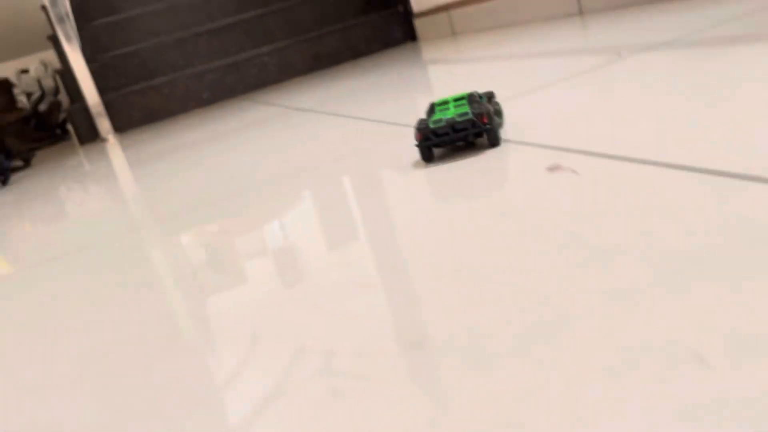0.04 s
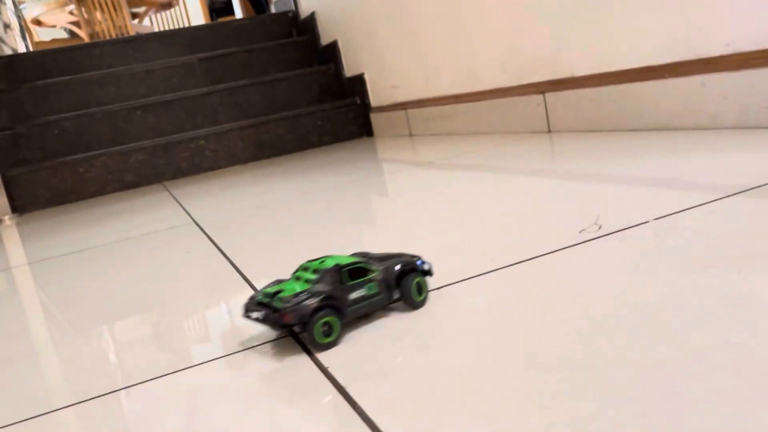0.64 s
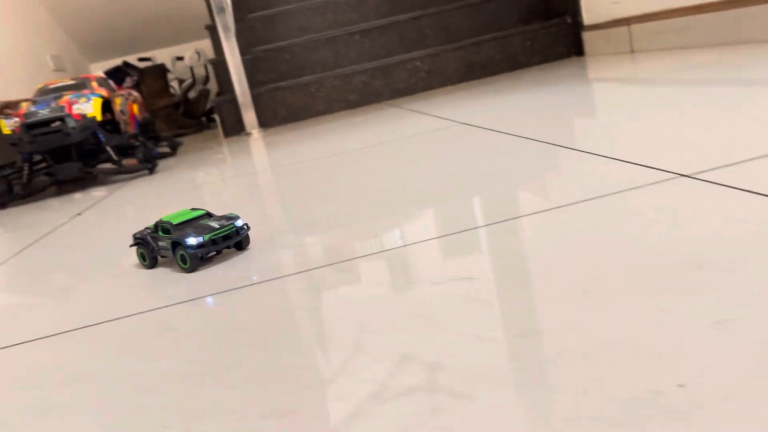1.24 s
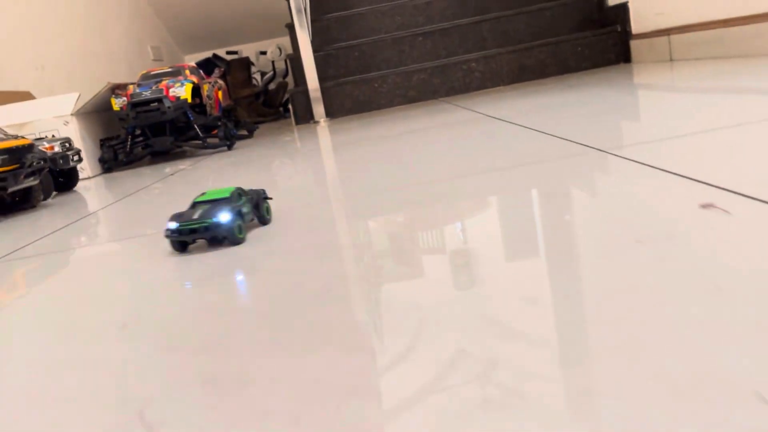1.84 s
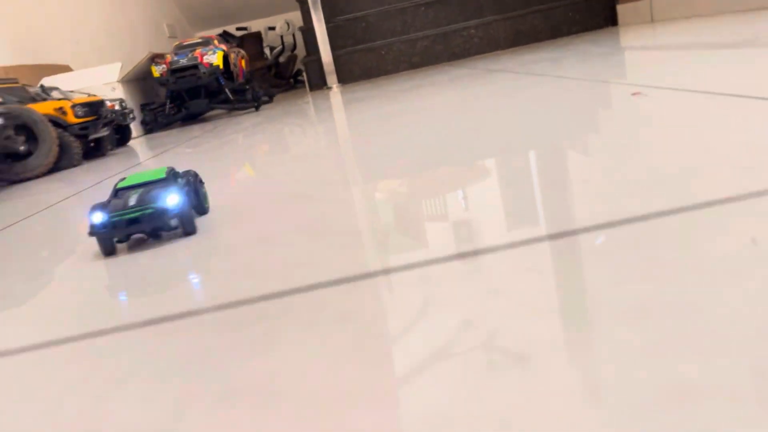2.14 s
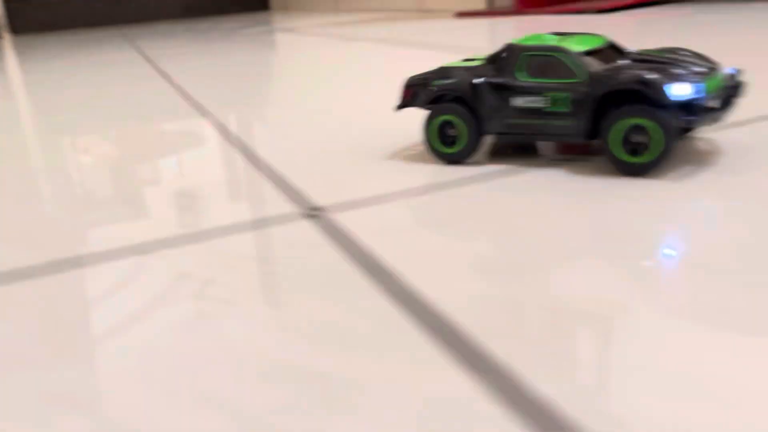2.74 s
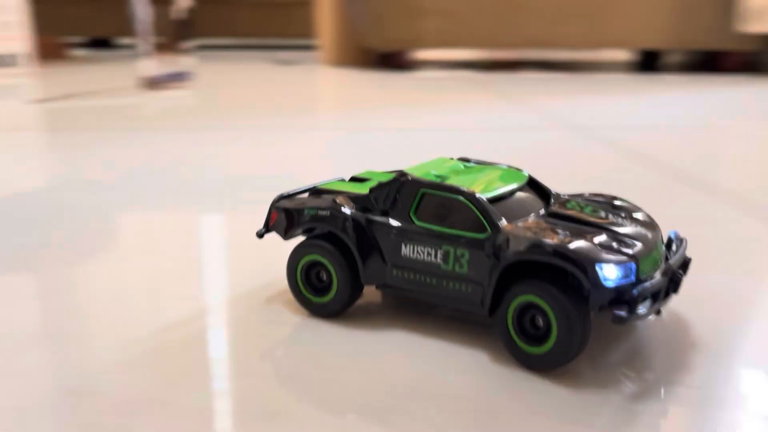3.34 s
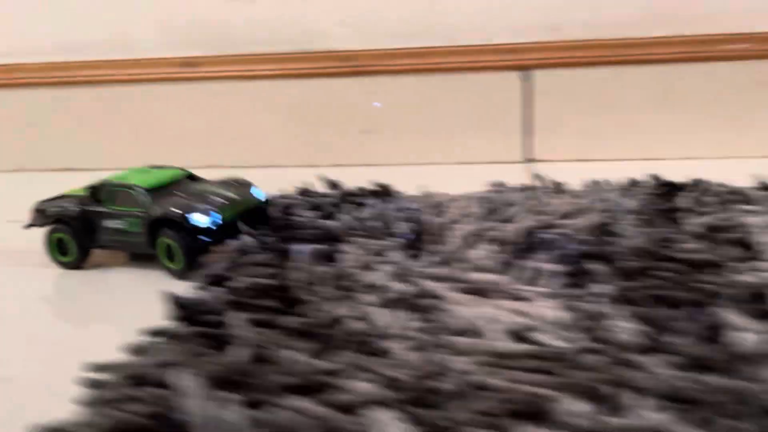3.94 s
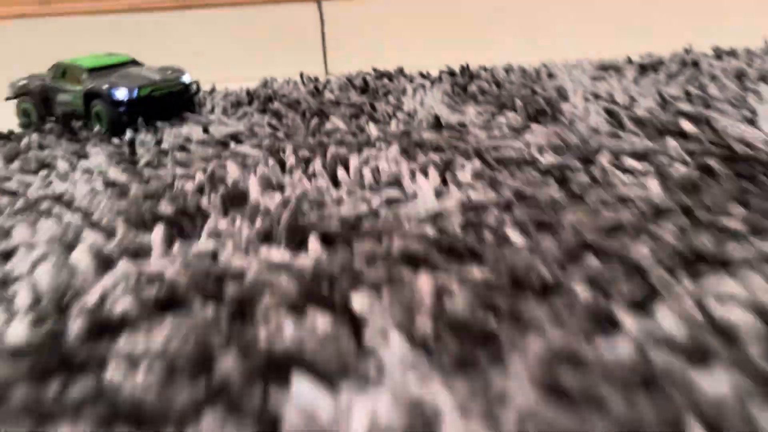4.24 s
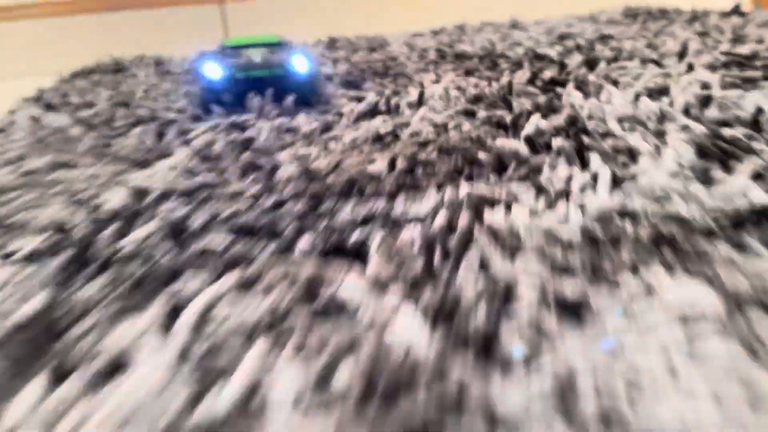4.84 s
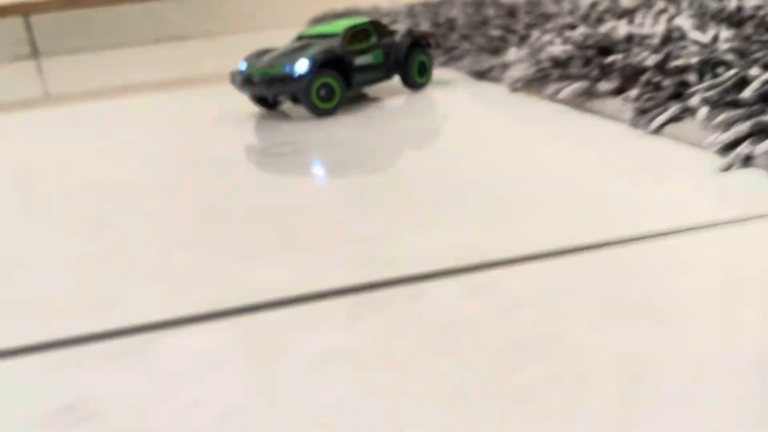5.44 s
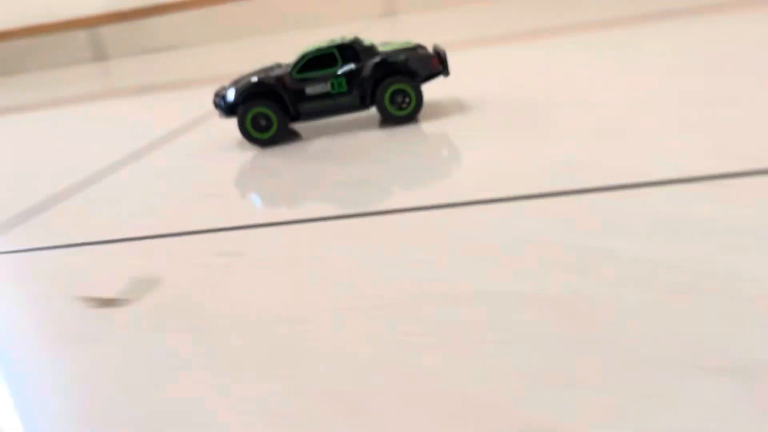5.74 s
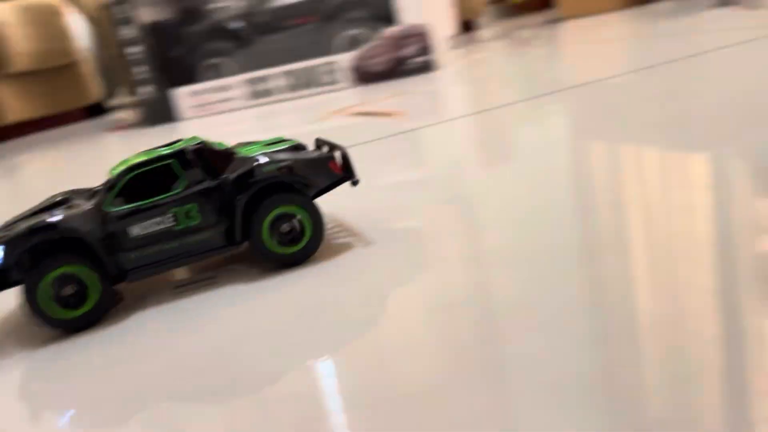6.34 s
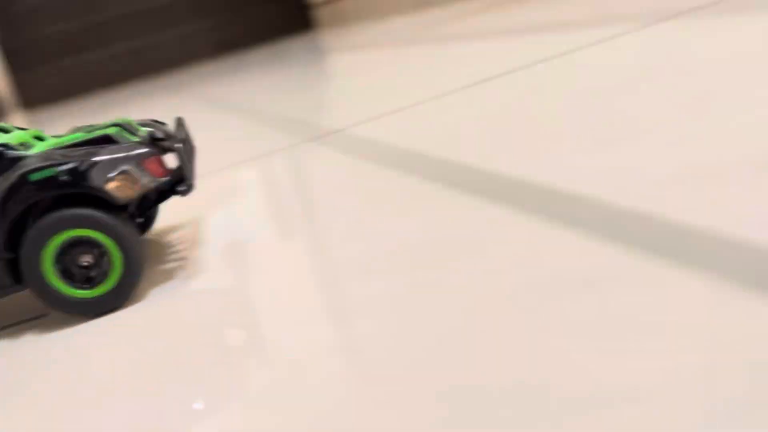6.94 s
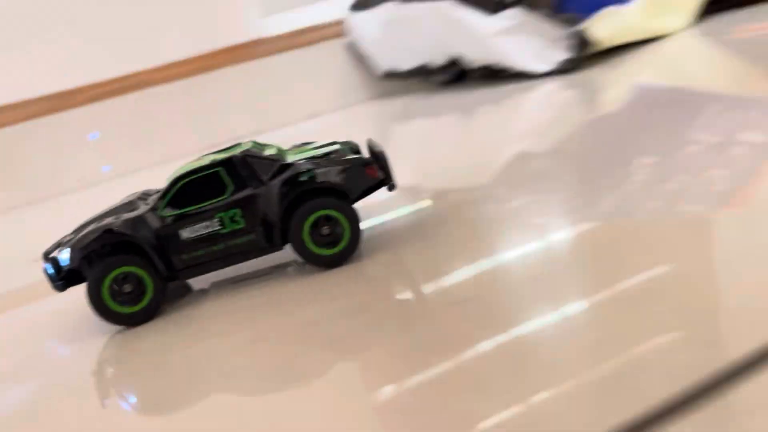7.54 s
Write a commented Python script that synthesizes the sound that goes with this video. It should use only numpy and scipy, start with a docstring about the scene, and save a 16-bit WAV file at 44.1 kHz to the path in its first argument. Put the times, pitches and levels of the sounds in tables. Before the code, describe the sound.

Plastic gears whine and a loose shell rattles and clacks as a toy truck drives across tile, over a rug and back.

```python
"""A small battery toy truck on the tiled floor of a hard room, followed with a hand-held microphone.
It coasts down, makes a short run, then a longer one: plastic gears whirr, the wheels shake the loose
shell into a rattle and clack over the joints. At 4 s it enters a shaggy rug, where little but the
labouring gears is left. From 5.4 s it is back on tile and rattles past close to the microphone.
Soft handling thumps, the low rush of the room and a faint hum lie underneath."""
import sys
import numpy as np
from scipy import signal
from scipy.fft import rfft, irfft
from scipy.io import wavfile
from scipy.ndimage import uniform_filter1d

SR = 44100
rng = np.random.default_rng(int(sys.argv[2]) if len(sys.argv) > 2 else 0)


def persist_wave(psi):
    """Save psi, clipped to +-1, as 16-bit WAV."""
    counts = np.round(np.clip(psi, -1, 1) * 32767).astype(np.int16)
    wavfile.write(sys.argv[1], SR, np.atleast_2d(counts).T)


N = 339129

# the legs of the drive: t/s, gear level at the microphone/dB, tooth rate/Hz
COAST = [(0, -47, 2150), (.15, -49.5, 2080), (.23, -52.5, 1900), (.33, -61.5, 1650), (.46, -63.5, 1400)]
SHORT_RUN = [(0.551, -59.5, 1400), (.66, -53, 1600), (0.799, -50.5, 1654), (1.03, -47.5, 2296),
             (1.15, -51, 1961), (1.281, -51.5, 1546), (1.42, -63.5, 1384)]
LONG_RUN = [(1.531, -61.5, 1493), (1.65, -52, 1710), (1.76, -49.5, 2020), (2.12, -46.5, 2097),
            (2.23, -45, 1780), (2.45, -44.5, 2019), (2.65, -44.5, 2119), (2.85, -43, 2389),
            (3.45, -41.5, 2330), (3.8, -47.5, 2280)]
RUG_CROSSING = [(4.05, -55, 1696), (4.11, -52, 1654), (4.2, -57, 1575), (4.34, -55.5, 1543),
                (4.5, -52.5, 1551), (4.85, -50.5, 1581), (5.05, -48, 1899), (5.37, -47.5, 2053)]
CLOSE_PASS = [(5.6, -45, 1661), (5.85, -44.5, 1682), (6.3, -42.5, 1989), (6.55, -40.5, 2545),
              (7.03, -39, 2550), (7.23, -42, 2388), (7.69, -48.5, 2443)]
# how far the wheels are in the pile of the rug: t/s, share (0-1)
ON_RUG = [(3.95, 0), (4.1, 0.98), (5.3, 1), (5.42, 0.05)]
# bursts of throttle load the gears: crest t/s, half length/s, whine lift/dB, lift of its octave/dB
THROTTLE = [(0.756, 0.04, 11, 8), (.87, 0.038, -2, 7), (.96, .05, 13, 1), (1.77, 0.094, 13.5, -7),
            (2.299, 0.08, 2, 5), (2.52, 0.16, 13, 4.5), (3.482, 0.11, -5, 7), (6.15, .15, -8, 9),
            (6.52, 0.077, 5, 4.5)]
# gears surge as the wheels slip and grip in the pile: crest t/s, f/Hz, level/dB, half length/s
SURGES = [(4.39, 1687, -48, 0.0089), (4.4, 1690, -45, 0.0078), (4.482, 1590, -49, .014),
          (4.637, 2000, -47, 0.02), (4.749, 2132, -46, 0.017), (4.899, 2088, -48, 0.02),
          (4.989, 2000, -43, 0.0047), (5.022, 2168, -39.5, 0.0062), (5.119, 2293, -43.5, 0.016),
          (5.23, 2344, -44, 0.014), (5.329, 2154, -44, 0.0087)]
# the side facing the microphone: t/s, chassis ring/dB, shell ring/dB (both re rattle), tyre lift/dB
FACING = [(0, -4.5, -4, 0.5), (.9, 1, -4.5, 0.5), (2.35, -17, -11, -6), (2.95, -13, -2.5, -0.5),
          (3.6, -2.5, 0, 4), (4.4, -9, -18, 7), (5.1, -8, -26, -11), (5.7, -4, -3, -0.5),
          (7.69, -2, -16, 4)]
# the chassis clacks at tile joints and jolts: t/s, strength/dB, offset for the low body/dB
CLACKS = [(0.097, -46, -17), (0.2185, -39, -15), (0.5863, -42, -11), (.617, -40.5, -10), (1.023, -53, 10),
          (1.3852, -40.5, -25), (1.8694, -41.5, -12), (2.261, -49, -14), (2.4298, -37, -12),
          (2.4687, -42, -6), (2.9936, -38, -5), (3.1342, -38.5, 3), (3.1831, -33.5, 0), (3.2313, -26.5, -7),
          (3.2845, -32, -7), (3.3131, -31, -3), (3.465, -32.5, -26), (3.6638, -33.5, -6),
          (3.713, -40.5, 3.5), (3.787, -40, 6.5), (3.8047, -43, -6.5), (3.8906, -38.5, -3.5),
          (3.913, -37, -5), (4.0937, -56.5, -0.5), (5.4076, -34.5, -22), (5.4153, -37, -5),
          (5.447, -37, -18), (5.4911, -32, -7.5), (5.5683, -33.5, -27), (5.6137, -39, -13),
          (5.6497, -38, -3.5), (6.2347, -34, -23), (6.2622, -32.5, -12), (6.2808, -35, -18),
          (6.3108, -35, -11), (6.3662, -32, -10), (6.6846, -33, -3), (6.82, -38.5, 5), (6.9435, -30, -11),
          (6.9823, -45.5, 11), (7.2424, -34.5, -24), (7.3432, -36.5, -14), (7.6151, -41.5, -25)]
# handling thumps at the microphone: t/s, peak level/dB, f/Hz
THUMPS = [(.1, -53, 60), (0.133, -50.5, 99.5), (0.363, -45.5, 80), (.57, -63, 109), (2.44, -50, 69.5),
          (3.621, -47.5, 74.4), (6.556, -40.5, 94), (6.662, -49, 84.3), (6.772, -50, 59.8),
          (7.315, -44, 67.9)]
# swells of the background hum: crest t/s, level/dB
HUM_SWELLS = [(1.35, -69), (2.55, -78), (3.65, -68.5), (4.8, -73)]
# colours of the truck's parts and of the room's rush: f/Hz, relative level/dB
GEARBOX_COLOUR = [(600, -22.5), (900, -8.5), (1080, -7), (1200, 1), (1370, 1), (1490, -3.5), (1640, 0),
                  (1850, -6), (2120, -1), (2400, -4.5), (2750, -8), (3100, -19), (5000, -32)]
SHELL_COLOUR = [(700, -22), (1250, 0), (1850, -9.5), (2300, 7), (2850, -4), (3400, 3.5), (3850, -2.5),
                (4250, -1.5), (5500, -2), (7000, -8), (8200, -4.5), (9500, -14.5), (12000, -14.5)]
TICK_COLOUR = [(7000, -2.5), (9000, -3.5), (10300, -6.5), (11300, -12), (13200, -7.5), (14700, 1.5),
               (16000, -12)]
TYRE_COLOUR = [(150, -12.5), (290, -13.5), (400, -8), (720, -1.5), (950, -2), (1300, 8.5), (2500, -54.5)]
CLACK_TOP_COLOUR = [(1500, -22.5), (3000, -11.5), (4000, -2.5), (5000, 7.5), (7000, 3), (11000, -1.5),
                    (14500, -2.5), (16000, 0)]
CLACK_BODY_COLOUR = [(300, -14.5), (900, -21), (1250, 1), (1800, -9), (2500, -7), (3500, -7), (6000, -10.5)]
ROOM_COLOUR = [(20, -16), (45, 3), (75, 0), (100, 2.5), (125, -5), (160, -3.5), (230, -8.5), (400, -5),
               (900, -16), (3000, -23.5), (16000, -31.5)]
# resonances of chassis, shell, hollow wheels, motor casing and brushes: f/Hz, width/Hz, gain/dB
CHASSIS_MODES = [(2554, 170, -2), (3176, 110, -3), (1277, 450, -13.5)]
SHELL_MODES = [(4310, 790, 1), (5160, 720, 4.5), (6300, 280, 0), (8050, 200, -6)]
WHEEL_MODES = [(594, 60, 10), (370, 135, -2)]
MOTOR_MODES = [(230, 44, -1.5), (358, 79, 0.5), (10550, 350, -15)]
# how parts follow the drive: base level/dB, dB per gear dB, dB per octave of speed, change on rug/dB
RATTLE_LAW = (-45.5, 1.53, 3.5, -16)
TICK_LAW = (-52.5, 2.1, 1, -19)
ROLL_LAW = (-56.5, 1.34, -2, -4.5)
MOTOR_LAW = (-74.5, 0.9, -10.5, 1)
# the mesh sings as the motor labours: level re gears/dB, dB per octave of speed, change on rug/dB
WHINE_LAW, OCTAVE_LAW = (-13, -5, 8.55), (-11, 7.5, -13)
CRUISE_DB, CRUISE_TEETH_HZ = -45, 2000   # the drive at which these laws give their base levels


def running_truck(surge_lift_db=2, surge_half_s=0.016):
    """Drive, speed and ground set the level of every part; throttle brings out the whine."""
    drive_db, teeth_hz = in_time(COAST + SHORT_RUN + LONG_RUN + RUG_CROSSING + CLOSE_PASS)
    drive_db += surge_lift_db * np.max([swell(s, surge_half_s) for s, *_ in SURGES], axis=0)
    on_rug, = in_time(ON_RUG)
    chassis_db, shell_db, tyre_lift_db = in_time(FACING)
    octaves = np.log2(teeth_hz / CRUISE_TEETH_HZ)
    rattle_db, tick_db, roll_db, strain_db = [
        db + growth * (drive_db - CRUISE_DB) + speed_db * octaves + rug_db * on_rug
        for db, growth, speed_db, rug_db in (RATTLE_LAW, TICK_LAW, ROLL_LAW, MOTOR_LAW)]
    whine_db, octave_db = [db + speed_db * octaves + rug_db * on_rug
                           for db, speed_db, rug_db in (WHINE_LAW, OCTAVE_LAW)]
    for s, half_s, whine_lift_db, octave_lift_db in THROTTLE:
        load = swell(s, half_s)
        whine_db += whine_lift_db * load
        octave_db += octave_lift_db * load
    drivetrain = gears(drive_db, teeth_hz, whine_db, octave_db, on_rug) + surges() + motor(strain_db)
    return drivetrain + rattle(rattle_db, tick_db, chassis_db, shell_db) + tyres(roll_db + tyre_lift_db)


def gears(drive_db, teeth_hz, whine_db, octave_db, on_rug):
    """Teeth knock unevenly and their mesh sings a rough whine; the rug tugs at speed and level."""
    tug = on_rug * drift(14)
    wobble, backlash = .013 * drift(35), .045 * drift(260)
    teeth_passed = np.cumsum(teeth_hz * (1 + .035 * tug + wobble + backlash)) / SR
    knocks = np.diff(np.floor(teeth_passed), prepend=0) * rng.standard_normal(N)   # on either flank
    whirr = steady(through(knocks * from_db(2.5 * drift(49) - 1.3 * tug), GEARBOX_COLOUR))
    phase = 2 * np.pi * teeth_passed
    whine = steady(np.sin(phase) * from_db(4 * drift(90)))
    scatter = 0.95 * drift(300)   # uneven teeth blur the octave to a rasp
    octave = steady(np.sin(2 * phase + scatter) * from_db(4 * drift(120)))
    mesh = from_db(whine_db) * whine + from_db(octave_db) * octave
    return from_db(drive_db) * (from_db(-1) * whirr + mesh)


def surges(wobble=0.04, octave_db=-30, flutter_db=2.5):
    """Brief rough swells of whine as the wheels slip and grip in the rug."""
    t, out = np.arange(N) / SR, np.zeros(N)
    clock = np.cumsum(1 + wobble * drift(151.2)) / SR
    for s, hz, db, half_s in SURGES:
        near = np.abs(t - s) < .1
        phase = 2 * np.pi * hz * clock[near]
        whine = np.sqrt(2) * (np.sin(phase) + from_db(octave_db) * np.sin(2 * phase))
        out[near] += from_db(db) * swell(s, half_s)[near] * whine
    return out * rms_one(from_db(flutter_db * drift(160)))


def rattle(rattle_db, tick_db, chassis_db, shell_db, shake_db=1.58):
    """Loose parts buzz against shell and chassis; hard little contacts add bright ticks."""
    shake = from_db(shake_db * drift(36))   # the wheels jolt all parts together
    blows = impacts(per_s=1700, spread_db=3) * shake
    hard = impacts(per_s=300, spread_db=3.5) * shake
    buzz = from_db(-0.4) * steady(through(contacts(blows + .3 * hard, decay_s=0.0028), SHELL_COLOUR))
    rings = from_db(chassis_db) * steady(resonate(contacts(blows, decay_s=0.0012), CHASSIS_MODES))
    rings += from_db(shell_db) * steady(resonate(contacts(blows, decay_s=0.0007), SHELL_MODES))
    ticks = steady(through(contacts(0.18 * blows + hard, decay_s=0.0022), TICK_COLOUR))
    return from_db(rattle_db) * (buzz + rings) + from_db(tick_db) * ticks


def contacts(blows, decay_s):
    """Every blow sets off a short burst of micro-impacts between plastic parts."""
    energy = signal.lfilter([1], [1, -np.exp(-2 / (decay_s * SR))], blows ** 2 + 1e-18)
    return np.sqrt(energy) * rng.standard_normal(N)


def clacks(bounce_s=0.0034, bounce_db=-5, ping_db=-8, ping_s=0.002, ping_hz=4800, size=3000):
    """Each jolt slaps the chassis against its stops, with one weaker rebound; one part pings briefly."""
    top, body, pings = np.zeros((3, N + size))
    age = np.arange(size) / SR
    for s, db, body_db in CLACKS:
        hz = ping_hz * np.exp(.12 * rng.standard_normal())
        ping = np.exp(-age / ping_s) * np.sin(2 * np.pi * hz * age)
        for delay, hit_db in [(0, db), (bounce_s * rng.uniform(0.71, 1.5), db + bounce_db)]:
            at = min(int((s + delay) * SR), N)
            hit = chatter(decay_s=0.0014)
            top[at:at + len(hit)] += from_db(hit_db) * hit
            body[at:at + len(hit)] += from_db(hit_db + body_db) * chatter(decay_s=0.0045)
            pings[at:at + size] += from_db(hit_db + ping_db) * ping
    snap = from_db(19) * through(top, CLACK_TOP_COLOUR)
    return snap + from_db(24.5) * through(body, CLACK_BODY_COLOUR) + pings[:N]


def chatter(decay_s, size=1500):
    """One contact of plastic parts: a dying burst of micro-impacts, of unit energy."""
    burst = rng.standard_normal(size) * np.exp(-np.arange(size) / (decay_s * SR))
    return burst / np.linalg.norm(burst)


def tyres(roll_db):
    """Tread blocks patter on the floor and set the hollow wheels ringing."""
    patter = impacts(per_s=1500, spread_db=4)
    tread = from_db(2.05) * steady(through(patter, TYRE_COLOUR))
    wheels = from_db(-11.5) * steady(resonate(patter, WHEEL_MODES))
    return from_db(roll_db) * (tread + wheels)


def motor(strain_db):
    """The loaded motor's casing drones low and its brushes sing thinly."""
    return from_db(strain_db) * rms_one(resonate(rng.standard_normal(N), MOTOR_MODES))


def room_echoes(x, low_t60_s=0.3, treble_t60_s=0.37, split_hz=4500, gap_s=0.00558):
    """Diffuse echoes off tile and plaster; the treble rings a little longer."""
    t, noise = np.arange(SR) / SR, rng.standard_normal(SR)
    low = signal.sosfilt(signal.butter(1, split_hz, fs=SR, output="sos"), noise)
    tail = low * from_db(-60 * t / low_t60_s) + (noise - low) * from_db(-60 * t / treble_t60_s)
    tail *= t > gap_s
    return signal.fftconvolve(x, tail / np.linalg.norm(tail))[:N]


def handling_thumps(rise_s=0.007):
    """Dull bumps of a few cycles reach the microphone through the hand."""
    out = np.zeros(N)
    for s, db, hz in THUMPS:
        age = np.clip(np.arange(N) / SR - s, 0, 1)
        envelope = age / rise_s * np.exp(1 - age / rise_s)
        out += from_db(db) * envelope * np.sin(2 * np.pi * hz * age)
    return out


def room_tone(rush_db=-63.5, hum_hz=166, sag_hz_per_s=6, hum_floor_db=-81.5, flicker_db=4.5):
    """The low rush of the room and a faint, wavering hum that sinks in pitch and swells now and then."""
    hz = (hum_hz - sag_hz_per_s * np.arange(N) / SR) * (1 + 0.0936 * drift(65))
    hum = np.sqrt(2) * np.sin(2 * np.pi * np.cumsum(hz) / SR)
    level = from_db(hum_floor_db) + sum(from_db(db) * swell(s, half_s=0.19) for s, db in HUM_SWELLS)
    level *= from_db(flicker_db * drift(25))
    return level * hum + from_db(rush_db) * through(rng.standard_normal(N), ROOM_COLOUR)


def impacts(per_s, spread_db):
    """Random blows, many faint and a few hard."""
    sizes = from_db(spread_db * np.minimum(rng.exponential(1, N), 4))
    return (rng.random(N) < per_s / SR) * sizes * rng.choice([-1, 1], N)


def resonate(x, modes):
    """Parallel resonances of alternating sign, each peaking at its listed gain."""
    out = 0
    for k, (hz, width, db) in enumerate(modes):
        r = np.exp(-np.pi * width / SR)
        ring = signal.lfilter([1, 0, -1], [1, -2 * r * np.cos(2 * np.pi * hz / SR), r * r], x)
        out += (-1) ** k * from_db(db) * (1 - r * r) / 2 * ring
    return out


def through(x, colour, size=4096):
    """Pass a sound through a body of the given colour: a minimum-phase response of unit energy."""
    hz, db = np.transpose(colour)
    octaves = np.log2(np.maximum(np.arange(size // 2 + 1), .5) * SR / size)
    outside = np.abs(octaves - np.clip(octaves, np.log2(hz[0]), np.log2(hz[-1])))
    gain = from_db(np.interp(octaves, np.log2(hz), db) - 20 * outside)
    cepstrum = irfft(np.log(gain))
    cepstrum[1:size // 2] *= 2   # folding makes the response causal
    cepstrum[size // 2 + 1:] = 0
    response = irfft(np.exp(rfft(cepstrum)))
    return signal.fftconvolve(x, response / np.linalg.norm(response))[:N]


def drift(hz):
    """Smooth random wander of unit rms, mostly slower than hz."""
    r = np.exp(-16 * np.pi * hz / SR)   # the pole at an eighth of the sample rate
    slow = signal.lfilter([1], [1, -2 * r, r * r], rng.standard_normal(N // 8 + 4002))[4000:]
    return np.interp(np.arange(N) / 8, np.arange(len(slow)), rms_one(slow))


def swell(s, half_s):
    """A bell-shaped rise and fall of height 1, cresting at time s."""
    return np.exp(-.5 * np.minimum(((np.arange(N) / SR - s) / half_s) ** 2, 100))


def in_time(rows):
    """Each column of a timed table, sample by sample."""
    s, *columns = np.transpose(rows)
    return [np.interp(np.arange(N) / SR, s, column) for column in columns]


def steady(x, size=2600):
    """Unit level over some 60 ms, the fast grain kept."""
    return x / np.sqrt(np.maximum(uniform_filter1d(x * x, size), 0) + 1e-12)


def rms_one(x):
    """Scale to unit rms."""
    return x / np.sqrt(np.mean(x ** 2) + 1e-20)


def from_db(db):
    """Decibels to gain."""
    return 10 ** (np.asarray(db) / 20)


def scene():
    """One microphone near the truck: direct sound, echoes, room tone and handling."""
    running, knocks = running_truck(), clacks()
    direct = from_db(-1.16) * running + knocks
    echoes = room_echoes(from_db(-13.5) * running + from_db(-5.5) * knocks)
    return (direct + echoes + room_tone() + handling_thumps())[None]


def record(dry):
    """The top is cut steeply above 15950 Hz."""
    return signal.sosfilt(signal.ellip(12, .1, 80, 15950, fs=SR, output="sos"), dry)


dry = scene()
out = record(dry)
persist_wave(out)
```